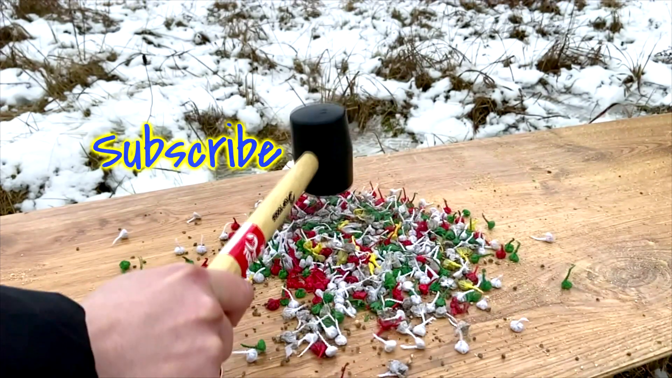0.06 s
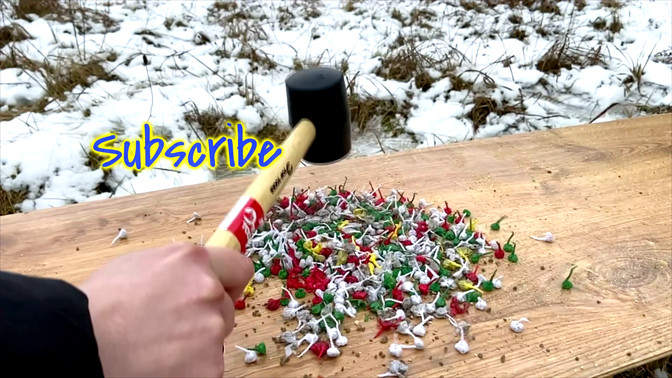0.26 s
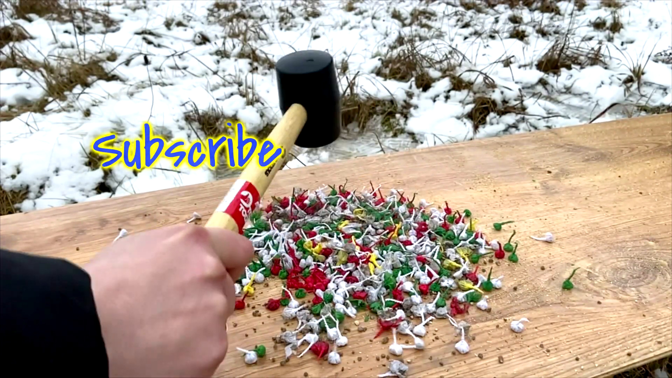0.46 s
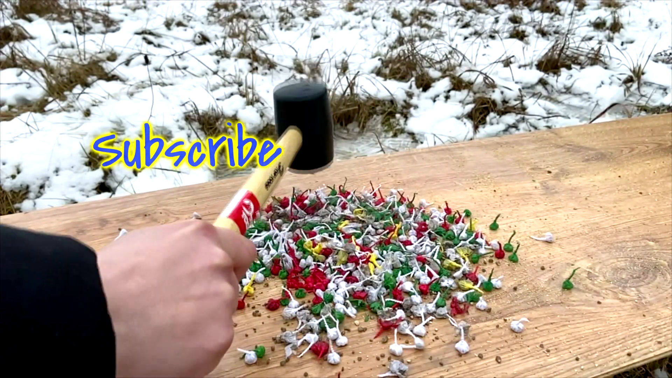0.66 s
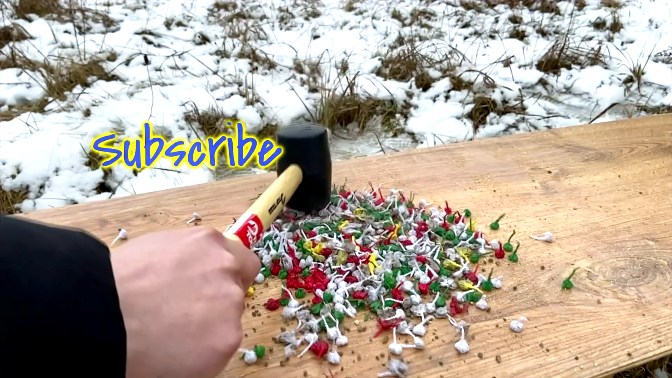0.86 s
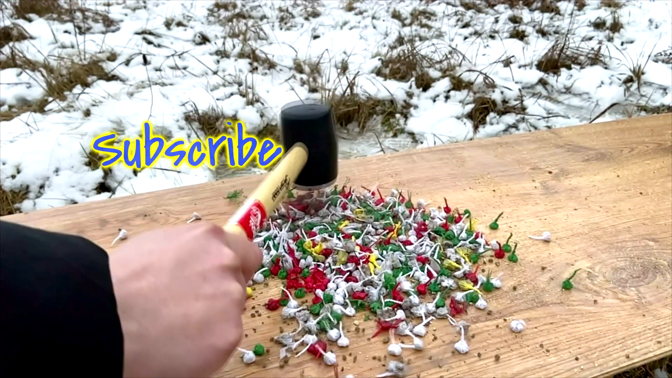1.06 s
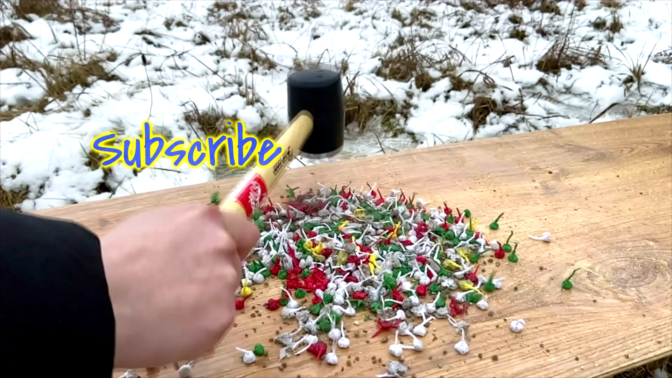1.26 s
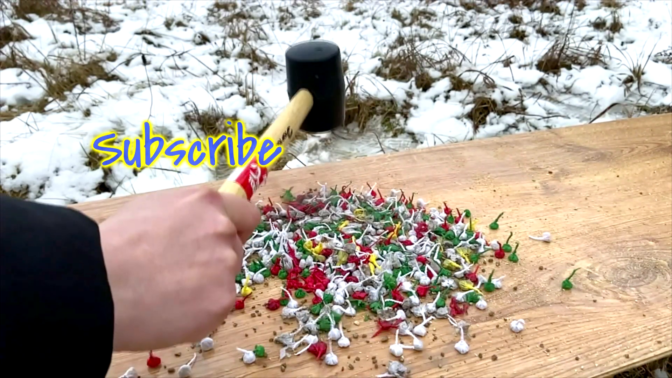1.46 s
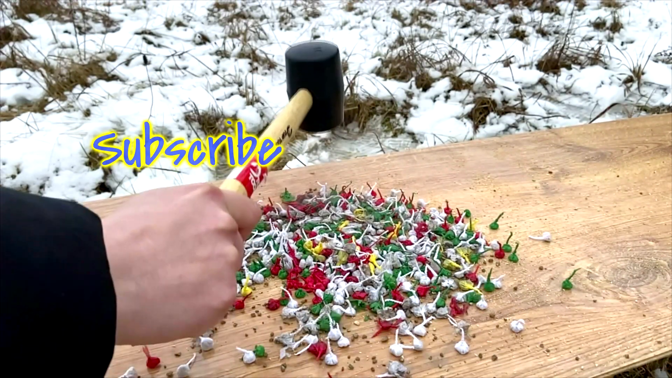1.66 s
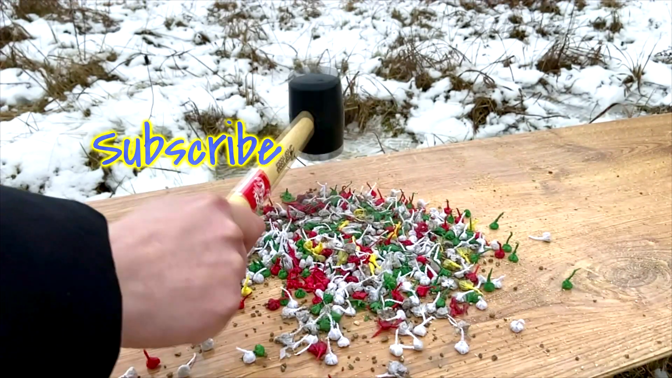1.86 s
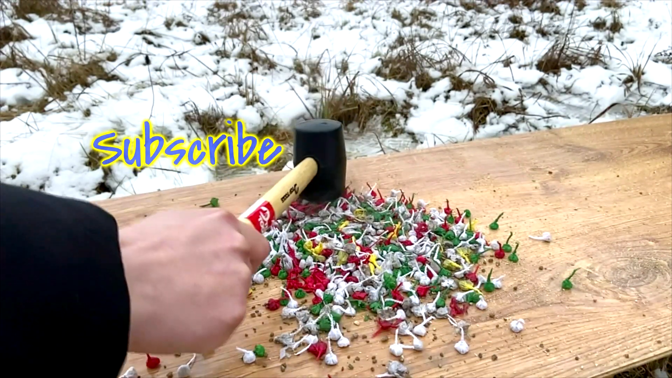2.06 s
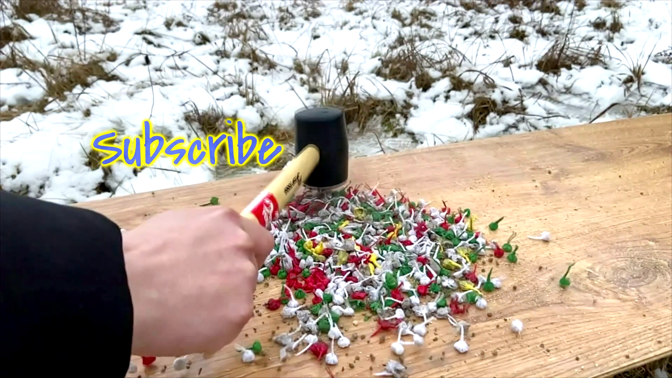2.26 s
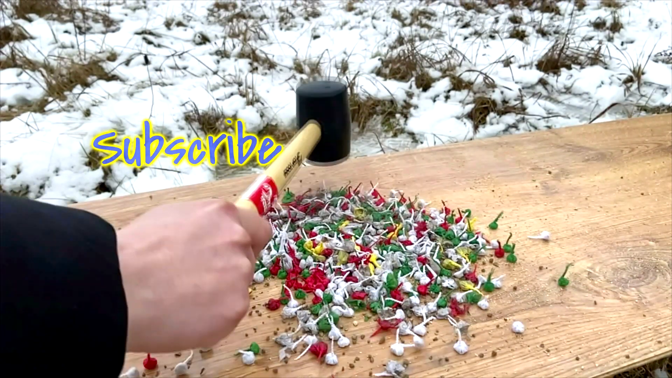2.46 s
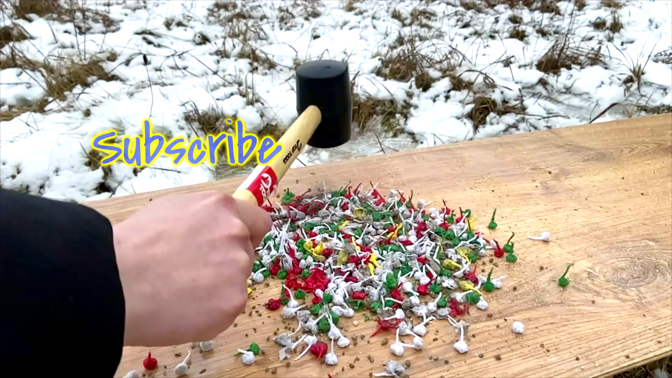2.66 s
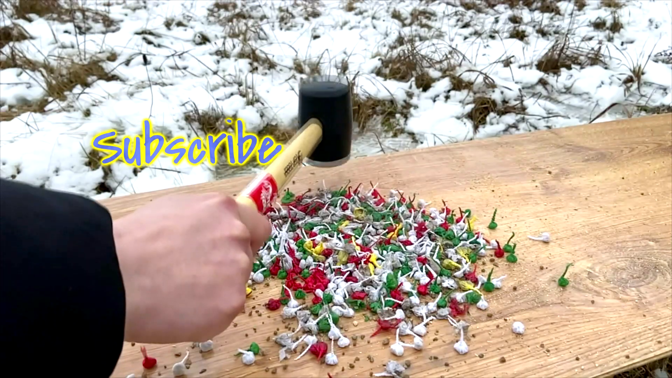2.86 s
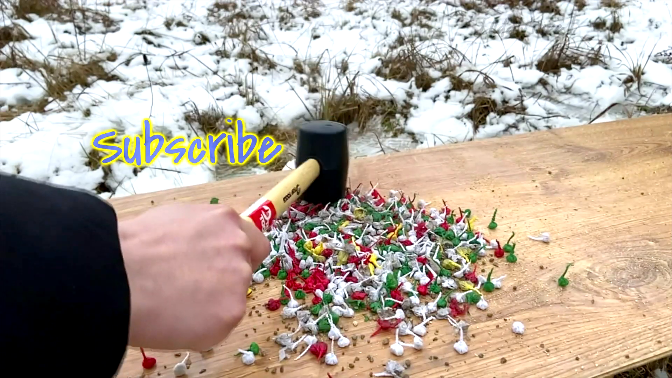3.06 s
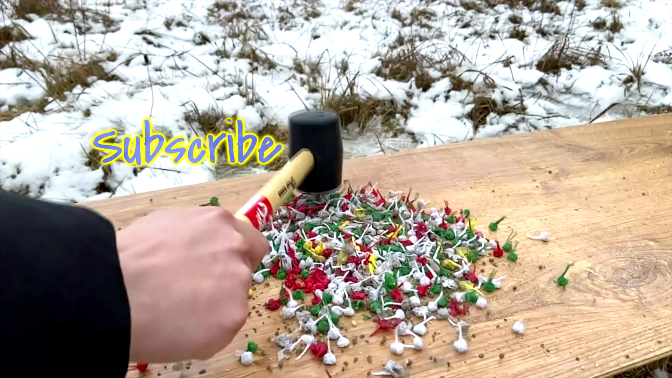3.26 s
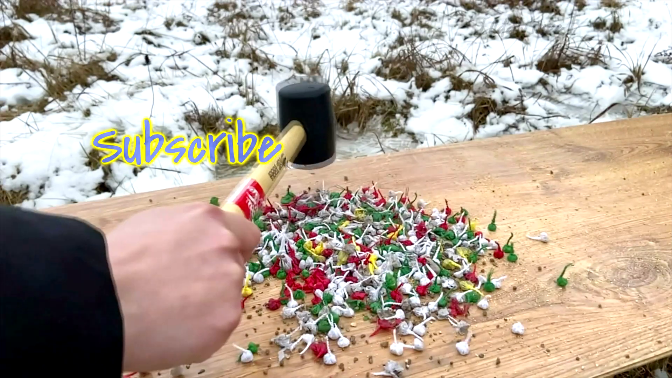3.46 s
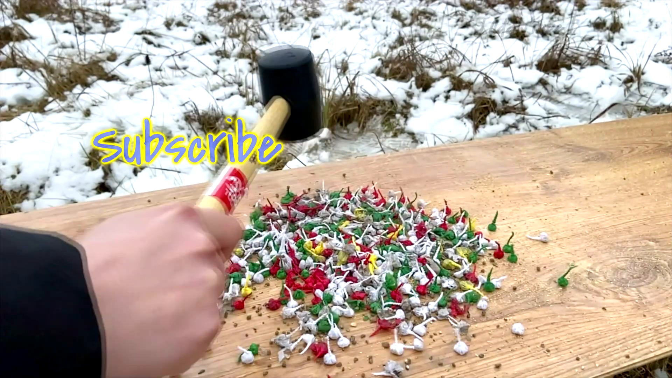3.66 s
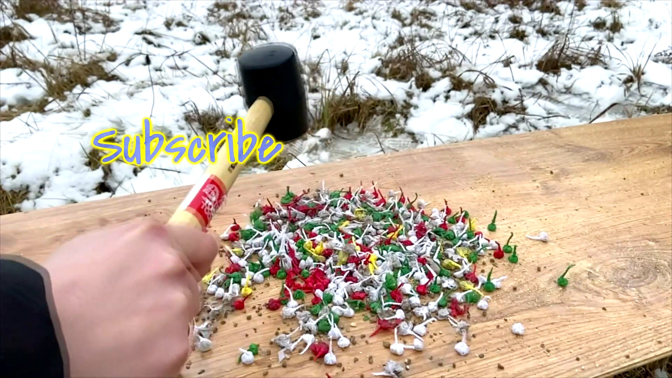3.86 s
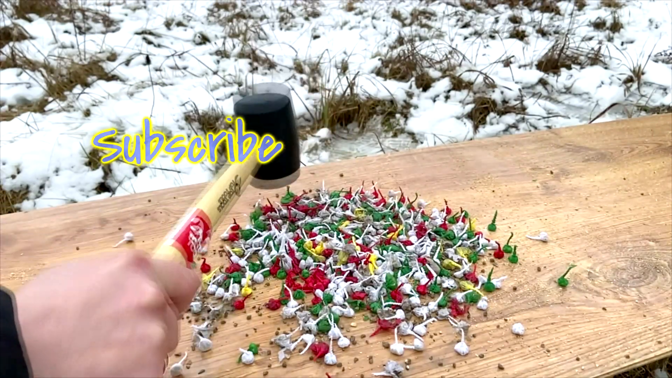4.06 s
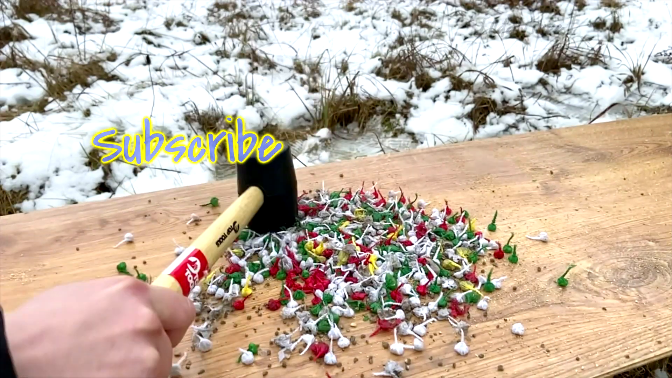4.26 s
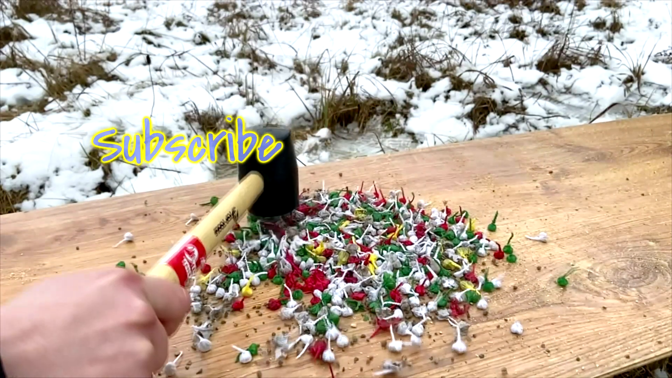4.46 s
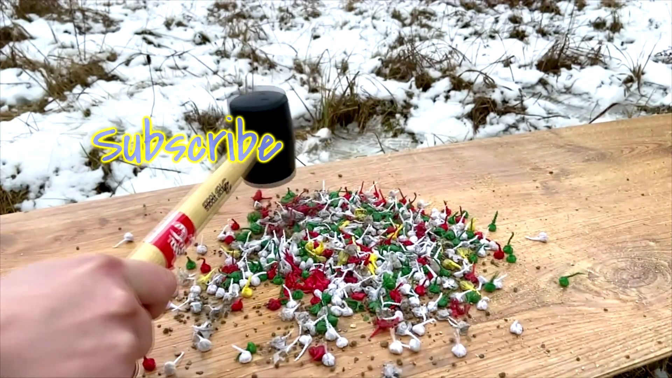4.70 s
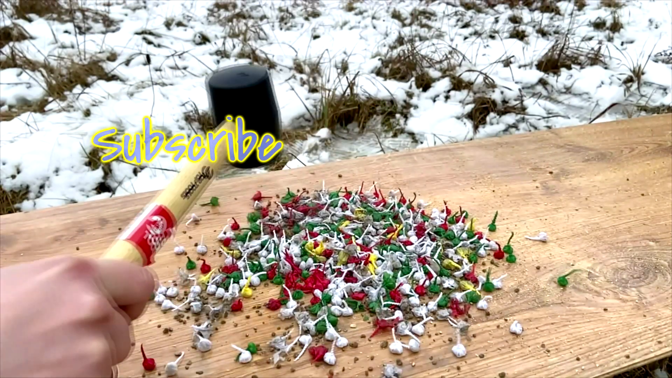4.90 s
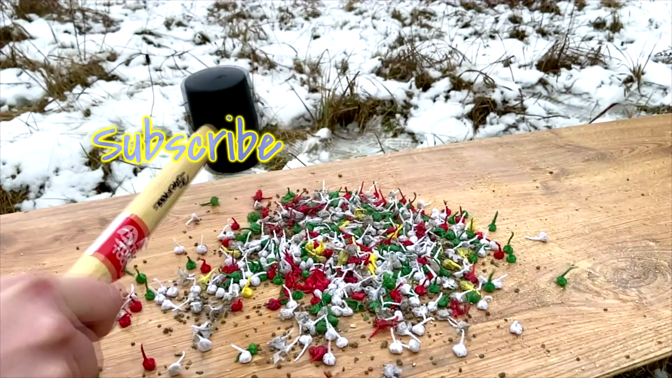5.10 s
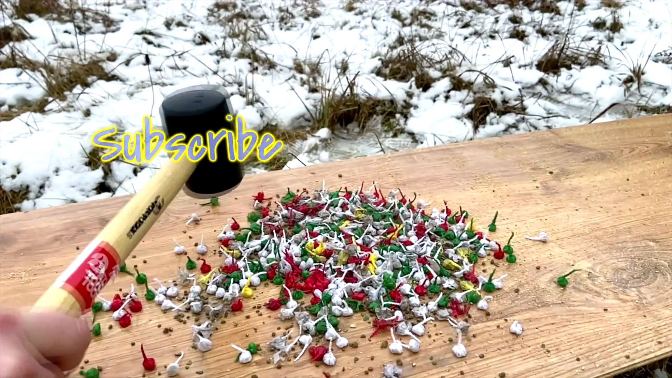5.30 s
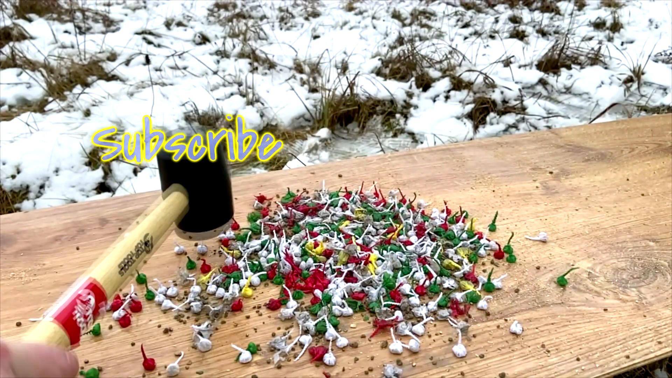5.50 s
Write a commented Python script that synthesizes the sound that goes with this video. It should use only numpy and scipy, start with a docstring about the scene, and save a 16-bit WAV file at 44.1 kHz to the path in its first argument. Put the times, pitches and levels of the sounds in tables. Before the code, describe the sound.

A rubber mallet hits paper snaps on a wooden plank four times outdoors, slowed down: crackling pops over deep, falling thuds.

```python
"""Faint open air, a low murmur from a plank and ticks of grit on the wood; then a rubber mallet comes
down four times on a heap of paper snaps lying there, all heard slowed and deepened. Each blow sets off
a cluster of pops over a thud that glides downward. The plank rings, rebounds and sways, and echoes wash
back from out in the field. The spaced pair of microphones overloads on the loudest pops."""
import sys
import numpy as np
from scipy import signal
from scipy.io import wavfile
from scipy.ndimage import uniform_filter1d

SR = 44100
rng = np.random.default_rng(int(sys.argv[2]) if len(sys.argv) > 2 else 0)


def generate_wav(signal):
    """Clip the signal to [-1, 1] and save it as 16-bit WAV at the path in sys.argv[1]."""
    frames = np.transpose(np.atleast_2d(signal))
    scaled = np.clip(frames, -1, 1) * 32767
    pcm = np.round(scaled).astype(np.int16)
    wavfile.write(sys.argv[1], SR, pcm)


N = 244181
LEFT_LAG_SAMPLES, BAND_LIMIT_HZ = 46, 16000


def gain_of(db):
    """Decibels to amplitude."""
    return 10 ** (np.asarray(db) / 20)


def unit_rms(x):
    """Scales to rms 1."""
    return x / np.sqrt(np.mean(x ** 2) + 1e-20)


def match_energy(x, envelope):
    """Scales each channel to the energy of an envelope."""
    return x * np.linalg.norm(envelope) / (np.linalg.norm(x, axis=1, keepdims=True) + 1e-12)


def db_at(spectrum, hz):
    """Joins a spectrum's points on a log frequency axis."""
    points_hz, points_db = np.transpose(spectrum)
    return np.interp(np.log(hz + 1), np.log(points_hz + 1), points_db)


def coloured(x, spectrum, tilt_db):
    """Minimum-phase filter of energy 1, its spectrum tilted by tilt_db per octave about 1 kHz."""
    hz = abs(np.fft.fftfreq(4096, 1 / SR))
    log_gain = np.log(gain_of(db_at(spectrum, hz) + tilt_db * np.log2(hz / 1000 + .1)))
    taps = np.fft.ifft(np.exp(np.conj(signal.hilbert(log_gain)))).real[:2048]
    return signal.fftconvolve(x, taps[None] / np.linalg.norm(taps), axes=1)[:, :x.shape[1]]


def ring(x, hz, width_hz):
    """One resonance, energy 1."""
    radius, angle = np.exp(-np.pi * width_hz / SR), 2 * np.pi * hz / SR
    ringing = signal.lfilter([1], [1, -2 * radius * np.cos(angle), radius ** 2], x)
    return np.sqrt(2 * (1 - radius ** 2)) * np.sin(angle) * ringing


def lowpass(x, hz):
    """Steep treble cut."""
    return signal.sosfilt(signal.butter(6, hz, fs=SR, output="sos"), x)


def pan(pan_db):
    """Gains at the two microphones; pan_db is always left minus right."""
    return gain_of(np.array([[.5], [-.5]]) * pan_db)


def spaced_pair(x, alike):
    """Two noises as spaced microphones hear them: partly alike, the left one late."""
    left = alike * x[1] + np.sqrt(1 - alike ** 2) * x[0]
    return np.array([np.pad(left[:-LEFT_LAG_SAMPLES], (LEFT_LAG_SAMPLES, 0)), x[1]])


def add(mix, start_s, sound):
    """Mixes a two-channel sound in at start_s."""
    start = round(start_s * SR)
    sound = sound[:, max(-start, 0):]
    part = mix[:, max(start, 0):][:, :sound.shape[1]]
    part += sound[:, :part.shape[1]]


# The plank's modes: pitch_hz, level_db, base_t60_s
PLANK_MODES = [(25.7, -2, 0.78), (38.7, 5.5, .5), (54, -3, 0.65), (73, -8, 0.51), (101.9, -0.5, .6),
               (136.7, -15.5, 0.33), (171, -17, 0.28), (210, -23, .2), (260, -22, 0.057), (312, -20, 0.34),
               (400, -25.5, 0.054)]
# Blows and rebounds on the plank: start_s, level_db, pan_db, tilt_db_per_octave, t60_factor
KNOCKS = [(-0.08, -36.5, 2, -1.5, 0.78), (0.871, -23, 1.5, 0, 0.92), (1.001, -37.5, -7, 3.5, 0.79),
          (2.085, -20.5, 2, .3, 0.53), (2.201, -33.5, 3.5, 1, 0.82), (2.39, -49.5, 10, 5.5, 0.78),
          (3.085, -26, -2.5, 5, 0.6), (3.191, -25.5, -1.7, -4, 0.61), (3.378, -47, 4.5, 1, 0.72),
          (4.279, -27.5, 0.5, 4.5, 0.9), (4.377, -31.5, 2.5, -0.5, 0.6), (4.532, -58.5, 8.5, 4, 0.75),
          (5.41, -60, 5, 1.5, 0.3)]


def plank_knock(start_s, level_db, pan_db, tilt_db, t60_factor):
    """Every mode of the plank rings up softly and dies unevenly as the plank rocks on the ground."""
    t = np.arange(0, .9, 1 / SR)
    hz, mode_db, t60 = np.transpose(PLANK_MODES)[:, :, None]
    phase = rng.random(hz.shape) + 0.13 * rng.standard_normal((2, *hz.shape))
    rocking = 1 + .5 * np.cos(2 * np.pi * rng.uniform(3, 9, hz.shape) * t)
    decay = gain_of(mode_db + tilt_db * np.log2(hz / 55) - 60 * t / (t60_factor * t60))
    modes = rocking * decay * np.sin(2 * np.pi * (hz * t + phase))
    rise_s = .016 * gain_of(0.3 * (-25 - level_db))  # weaker knocks ring up more slowly
    rise = (1 - np.exp(-t / rise_s)) ** 2
    return start_s, gain_of(level_db) * pan(pan_db) * rise * modes.sum(1)


# Dull and bright parts of what the field sends back: frequency_hz, density_db
FIELD_DULL = [(100, -30.5), (220, -9), (320, 4), (550, 5), (900, -6.5), (1800, -17.5), (4700, -31.5),
              (5000, -70.5)]
FIELD_BRIGHT = [(200, -32), (600, -10.5), (1100, -1), (1700, -2.5), (2250, -14.5), (2900, -5.5),
                (3400, -17.5), (3800, -10), (4700, -31), (5000, -55.5), (7000, -42), (9500, -54),
                (12000, -91)]
# Echoes reaching the microphones: arrival_s, dull_db, dull_fall_db_per_s, bright_db,
# bright_fall_db_per_s, bright_tilt_db_per_octave
ECHOES = [(-.02, -64.5, 20, -67.5, 23, 1.5), (.9, -57.5, 141, -75, 30, 1),
          (0.969, -69.5, 12, -62, 17, -0.8), (2.19, -82, 11, -68.5, 9, 0.86),
          (3.242, -79, 20.5, -69.5, 45, 5), (4.329, -62.5, 114, -74, 26.5, 1), (4.45, -87, 0, -70, 17, 3.5)]


def echo_power(t, hz, arrival_s, dull_db, dull_fall, bright_db, bright_fall, tilt_db):
    """One echo from out in the field, as power over time and frequency: it rises, fades and darkens."""
    rise_s, darken_db_per_octave_s = .06, 5
    age = np.maximum(t - arrival_s, 0)
    rise = np.clip(1 + (t - arrival_s) / rise_s, 0, 1) ** 2
    dull = gain_of(db_at(FIELD_DULL, hz) + dull_db - dull_fall * age)
    slope_db = (tilt_db - darken_db_per_octave_s * age) * np.log2(hz / 1200 + 0.13)
    bright = gain_of(db_at(FIELD_BRIGHT, hz) + bright_db - bright_fall * age + np.minimum(slope_db, 6))
    return rise * (dull ** 2 + bright ** 2)


# Open air at the microphones, a low rumble and a trace of hiss: frequency_hz, density_db
AIR = [(20, -71), (40, -78.5), (60, -80.5), (150, -80.5), (300, -86.5), (1000, -94.5), (4600, -110.5),
       (5200, -128), (7000, -117.5), (9500, -126.5), (16000, -132.5)]


def field_wash():
    """Steady air under the field's murmur and echoes, which flicker and go quiet at the end."""
    fade_s, fade_db_per_s = 5.4, 81
    frames = N // 256 + 5
    t, hz = np.arange(frames) * 256 / SR, np.fft.rfftfreq(1024, 1 / SR)[:, None]
    left_re, left_im, right_re, right_im, patches = rng.standard_normal((frames, 513, 5)).T
    noise = np.array([left_re + 1j * left_im, right_re + 1j * right_im])
    patches = unit_rms(uniform_filter1d(uniform_filter1d(patches, size=12, axis=0), size=6, axis=1))
    flicker_db = 0.61 * patches + 0.58 * rng.standard_normal(frames)
    murmur = gain_of(db_at(FIELD_DULL, hz) - 83.5) ** 2 + gain_of(db_at(FIELD_BRIGHT, hz) - 82.5) ** 2
    power = murmur + sum(echo_power(t, hz, *row) for row in ECHOES)
    field = np.sqrt(power) * gain_of(flicker_db - fade_db_per_s * np.maximum(t - fade_s, 0))
    spectra = noise * np.hypot(field, gain_of(db_at(AIR, hz)))
    wash = signal.istft(spectra, nperseg=1024, noverlap=768)[1]
    return spaced_pair(wash[:, :N], alike=.55)


# Slow swings of the plank: widest_s, level_db, pan_db
SWAYS = [(.1, -65, 11), (1.41, -37, 6), (2.661, -52, 8), (4.85, -64.5, 4)]


def plank_sway():
    """The swaying plank gives a very low tone with a weak octave, swelling and sinking with each swing."""
    pitch_hz, drop_db_per_s2, octave_db = 11, 79.5, -21.5
    t = np.arange(N) / SR
    swing = sum(gain_of(level_db - drop_db_per_s2 * (t - widest_s) ** 2) * pan(pan_db)
                for widest_s, level_db, pan_db in SWAYS)
    phase = 2 * np.pi * pitch_hz * t
    return np.sqrt(2) * swing * (np.sin(phase) + gain_of(octave_db) * np.sin(2 * phase))


# Colour of a pop on the wood, shared by grit and snaps: frequency_hz, level_db
WOOD_POP = [(150, -12), (500, 0), (750, -6.5), (1250, 1.5), (1700, -0.5), (2300, -10), (2900, -6.5),
            (3800, -15), (4700, -23.5), (5300, -48.5), (6600, -40), (8000, -55.5), (15000, -87.5)]
# Grit landing on the plank: start_s, level_db, pan_db
GRIT = [(0.381, -53, -15), (0.6185, -49.5, -7), (0.722, -45, 3), (1.044, -40, 5), (1.2584, -56.5, -2),
        (1.8544, -48, -3.5), (2.527, -53, 6.5), (2.5972, -38.5, 4), (2.7853, -50.5, 4), (3.362, -40, -5),
        (3.464, -40, -1), (4.77, -54, 2), (5.4744, -51.5, 2.5)]


def grit_tick(start_s, level_db, pan_db):
    """A grain lands on the wood with a short, soft tick."""
    t = np.arange(0, .06, 1 / SR)
    envelope = gain_of(-60 * t / 0.023) * (1 - np.exp(-t / 0.0037))
    burst = spaced_pair(rng.standard_normal((2, len(t))) * envelope, alike=0.24)
    tick = lowpass(coloured(burst, WOOD_POP, tilt_db=5.6), 4200)
    return start_s, gain_of(level_db) * pan(pan_db) * tick


# Thin notes around each cluster of pops: pitch_hz, level_db
SWELL_NOTES = [(480, -10), (660, -12), (860, -8), (1220, -0.5), (1490, -6.5), (1640, -6), (1900, -14.5)]


def thin_swell(t, reach_s):
    """Narrow notes swell into a cluster and hang faintly within reach_s of it, each time in a new mix."""
    peak_s, hang_db, spread_db = 0.014, -26.5, 5
    envelope = np.exp(-abs(t) / peak_s) + gain_of(hang_db) * np.clip((reach_s - abs(t)) / 0.019, 0, 1)
    puff = spaced_pair(rng.standard_normal((2, len(t))), alike=.6)
    notes = 0
    for hz, note_db in SWELL_NOTES:
        note = unit_rms(ring(ring(puff, hz, width_hz=45), hz, width_hz=45))
        notes += gain_of(note_db + spread_db * rng.standard_normal()) * note
    treble = gain_of(-14) * envelope ** 1.2 * coloured(puff, WOOD_POP, tilt_db=3)
    return pan(-7) * match_energy(envelope * notes + treble, envelope)


# The snaps' first front and the fizz of flying grit: frequency_hz, level_db
BANG = [(300, -23.5), (1000, -1), (2900, 1), (4300, -6.5), (5500, -23.5), (8000, -30), (12000, -40.5),
        (16000, -50)]
FIZZ = [(2500, -27), (3900, -4), (4600, 3), (5100, -23.5), (5900, -29.5), (6600, -10.5), (7300, -24),
        (9000, -42), (16000, -80.5)]
# Snaps going off under the mallet: start_s, level_db, pan_db, tilt_db_per_octave, t60_s, bang_db,
# glow_db, fizz_db, hollow_hz, hollow_db, wood_hz, wood_db, swell_db, swell_reach_s
# The levels of the parts are relative to level_db.
SNAP_CLUSTERS = [(0.816, -6.5, 0.5, 0.04, 0.1, 1.6, -34, -31, 1355, -7.5, 747, -5, -14, 0.038),
                 (.847, -6, 1, 0, 0.092, -4.5, -37.5, -42, 721, -0.7, 420, -4, -30, .05),
                 (0.857, -6.5, -2.5, -0.5, 0.041, -10, -27, -48, 1360, -0.4, 509.5, -4.5, -35.5, 0.047),
                 (2.069, -4.5, -2.5, 0.5, 0.037, -9, -37, -61, 1266, 2, 510, 1.5, -15, 0.095),
                 (2.077, -9, -3, -0.4, 0.073, -3.5, -36.5, -61, 1189, -12.5, 743, -2.5, -21, 0.12),
                 (3.068, -14.5, 0, -2.5, 0.068, -22.5, -27, -52.5, 1183, -5.5, 330, -3, -20.5, .07),
                 (4.258, -8, -2, 0.23, 0.04, -3, -33, -47.5, 1601, 2.5, 490, -2.4, -26, 0.07),
                 (4.268, -13, 1, 2.3, 0.05, -35, -24, -47, 988.5, -5, 702, -4, -7, 0.064)]


def snap_cluster(start_s, level_db, pan_db, tilt_db, t60_s, bang_db, glow_db, fizz_db,
                 hollow_hz, hollow_db, wood_hz, wood_db, swell_db, swell_reach_s):
    """A bright bang, then a dying volley of pops that rings the wood and the hollow under the mallet."""
    t = np.arange(-.12, .3, 1 / SR)
    age, fired = np.maximum(t, 0), t > 0
    noise = rng.standard_normal((2, len(t)))
    spikes_db = 1.7 * np.minimum(rng.exponential(1, len(t)), 4)
    attack = 1 - np.exp(-age / 0.0027)
    pops = spaced_pair(unit_rms(noise * gain_of(spikes_db)) * attack, alike=0.25)
    bunching = unit_rms(uniform_filter1d(rng.standard_normal(len(t)), size=200))  # snaps fire in bunches
    pops *= gain_of(0.65 * bunching)
    front = fired * gain_of(bang_db - 60 * (age / 0.014) ** 2)
    fall = fired * gain_of(-60 * age / t60_s)
    bang = match_energy(coloured(pops * front, BANG, tilt_db=0), front)
    volley = match_energy(coloured(pops * fall, WOOD_POP, tilt_db), fall)
    hollow = match_energy(lowpass(ring(pops * fall, hollow_hz, width_hz=63), 3800), fall)
    wood = match_energy(lowpass(ring(pops * fall, wood_hz, width_hz=57), 3600), fall)
    ringing = gain_of(hollow_db) * hollow + gain_of(wood_db) * wood
    # A dull afterglow and the fizz both hold, then drop.
    glow = coloured(pops * gain_of(glow_db - 60 * (age / 0.22) ** 2), WOOD_POP, tilt_db=-4.5)
    fizz = coloured(pops * gain_of(fizz_db - 60 * (age / 0.16) ** 4), FIZZ, tilt_db=0)
    swell = gain_of(swell_db) * thin_swell(t, swell_reach_s)
    cluster = bang + volley + ringing + glow + fizz + swell
    return start_s + t[0], gain_of(level_db) * pan(pan_db) * cluster


# The mallet's thud at each microphone: start_s, left_db, right_db, t60_s, rise_s,
# left_cycles, right_cycles (both per e-fold of time)
THUDS = [(.818, -1.1, -8, .2, .011, 1.63, 1.38), (.848, 1.9, -1.1, .28, .013, 1.37, 1.57),
         (2.071, -1.1, 1.9, .3, .028, 1.61, 1.455), (3.071, -14, -11, .22, .005, 1.455, 1.455),
         (4.261, -10.5, -10.5, .12, .01, 1.35, 1.73)]


def mallet_thud(start_s, left_db, right_db, t60_s, rise_s, left_cycles, right_cycles):
    """A deep thud that glides downward: its pitch falls as one over the time since the blow."""
    t = np.arange(0, .6, 1 / SR)
    phase = 2 * np.pi * np.array([[left_cycles], [right_cycles]]) * np.log(1 + t / .003)
    envelope = (1 - np.exp(-t / rise_s)) ** 2 * gain_of(-60 * t / t60_s)
    return start_s, gain_of([[left_db], [right_db]]) * envelope * np.sin(phase)


def scene():
    """The plank and the field around it, as they reach the spaced pair."""
    mix = field_wash() + plank_sway()
    for source, table in ((snap_cluster, SNAP_CLUSTERS), (mallet_thud, THUDS),
                          (plank_knock, KNOCKS), (grit_tick, GRIT)):
        for row in table:
            add(mix, *source(*row))
    return mix


def record(dry):
    """The microphones overload hard at full scale; a band limit follows."""
    overloaded = np.clip(dry, -1, 1)
    taps = signal.firwin(255, BAND_LIMIT_HZ, window=("kaiser", 9), fs=SR)
    return np.clip(signal.oaconvolve(overloaded, taps[None], "same"), -1, 1)


dry = scene()
out = record(dry)
generate_wav(out)
```